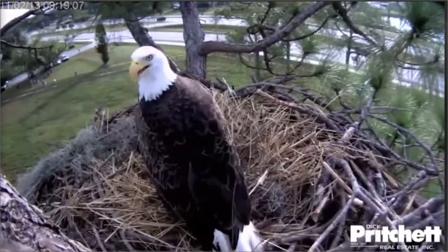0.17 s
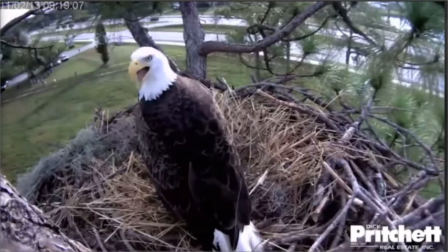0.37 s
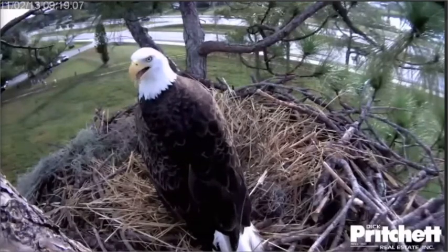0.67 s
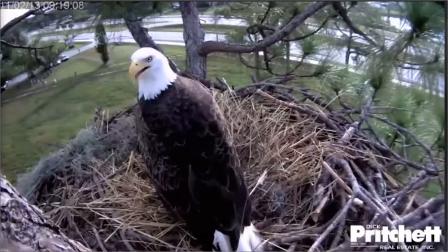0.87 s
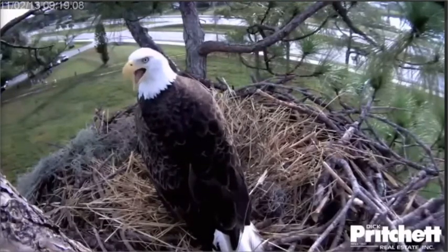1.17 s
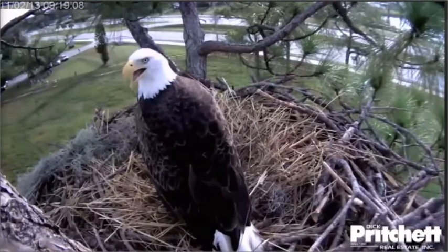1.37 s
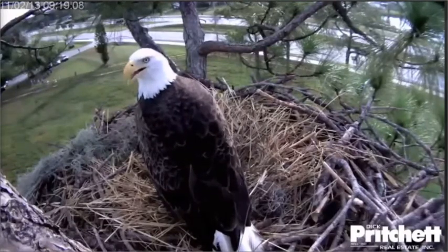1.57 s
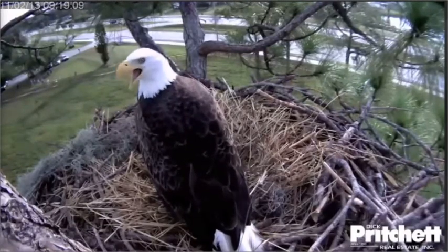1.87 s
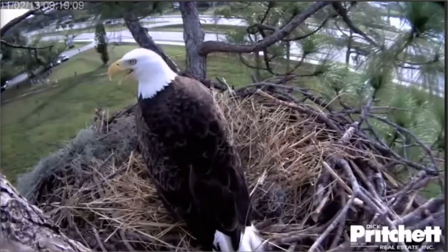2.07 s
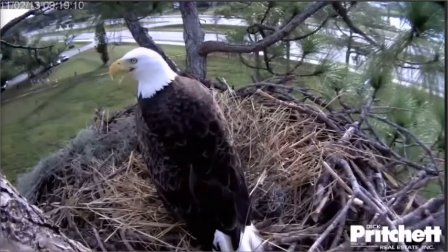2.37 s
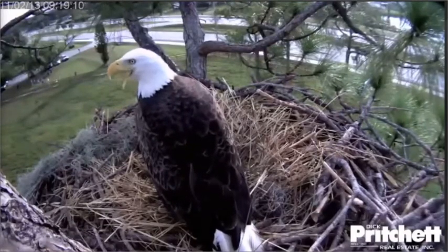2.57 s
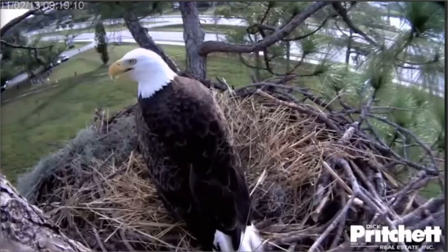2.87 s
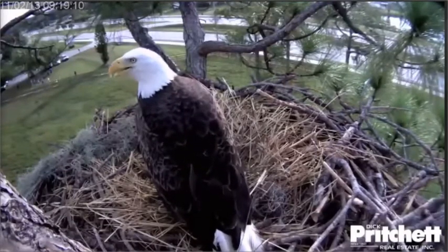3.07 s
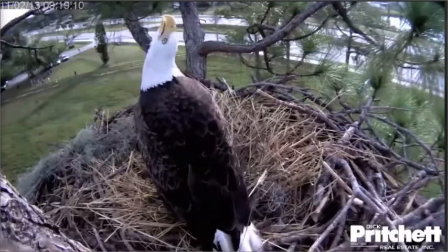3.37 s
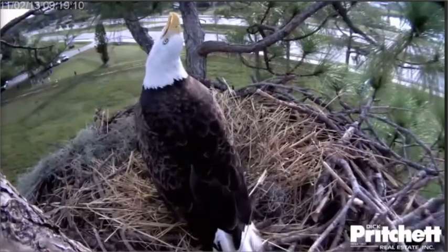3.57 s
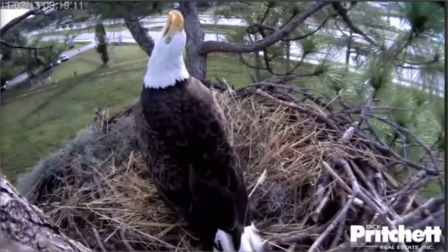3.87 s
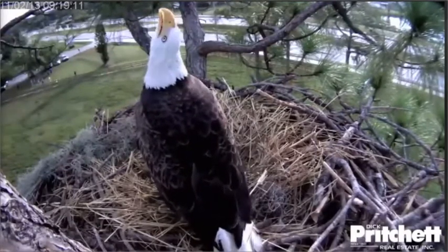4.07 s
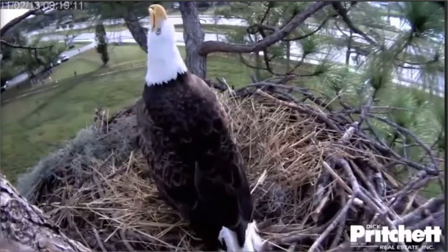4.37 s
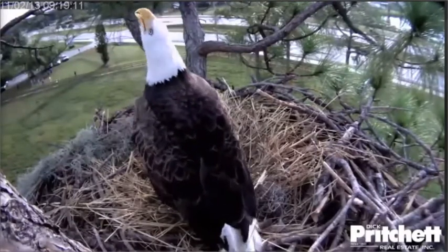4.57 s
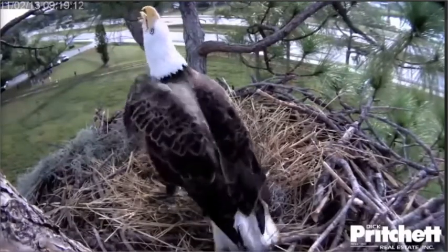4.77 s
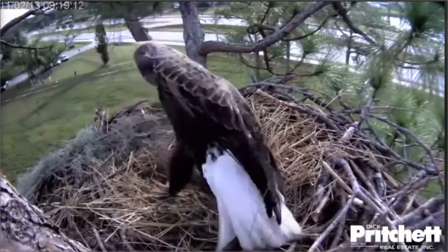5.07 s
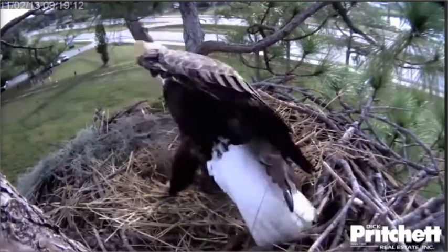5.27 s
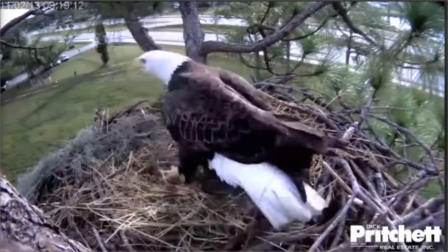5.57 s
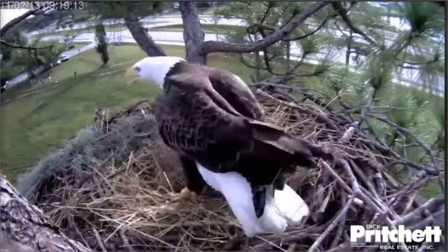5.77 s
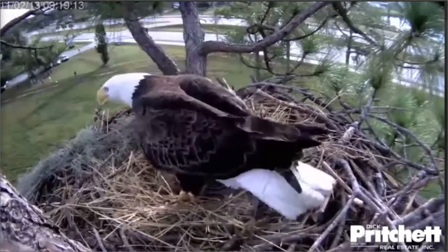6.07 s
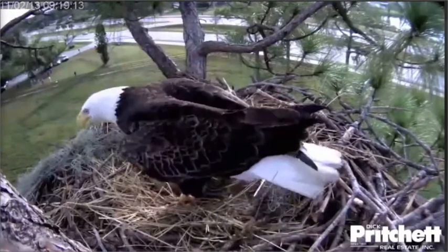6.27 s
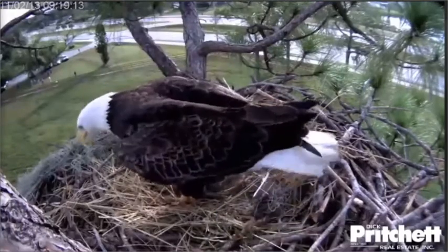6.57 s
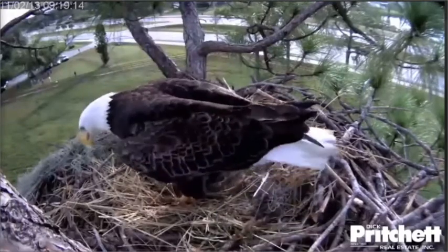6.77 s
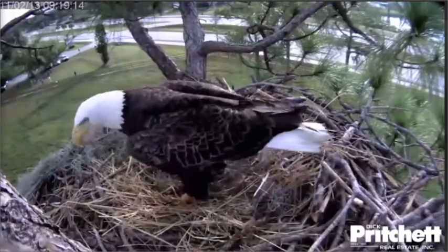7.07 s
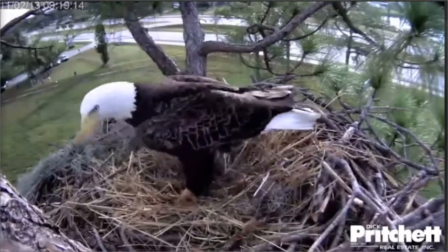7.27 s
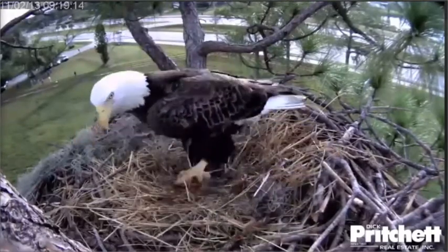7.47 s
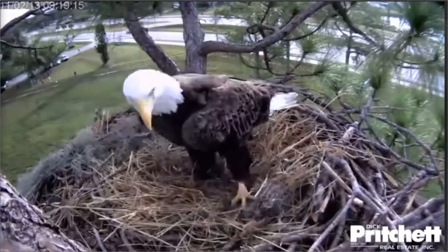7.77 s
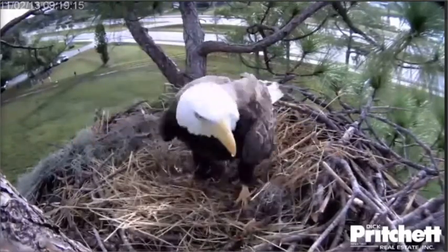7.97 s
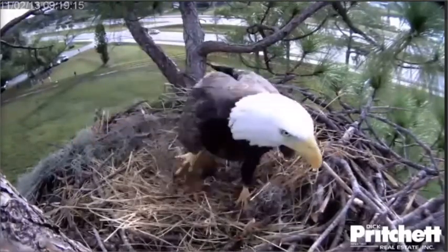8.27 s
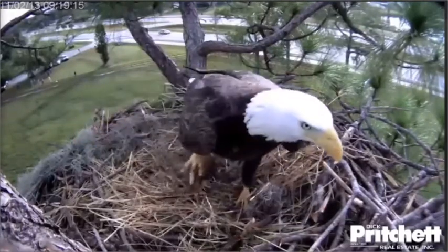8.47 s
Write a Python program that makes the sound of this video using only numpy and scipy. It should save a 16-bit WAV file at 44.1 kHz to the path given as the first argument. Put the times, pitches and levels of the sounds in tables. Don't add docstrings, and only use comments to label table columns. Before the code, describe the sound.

Outdoors at a treetop nest, a large eagle calls close to a cheap microphone. A low engine drone fades at once, then four long piercing whistles each start high and crack lower. Five short chips follow, each crumbling into a dry rapid chitter. After a pause come two quick notes. Steady hiss, faint mains hum and distant cars continue throughout.

```python
import sys
import numpy as np
from scipy import signal
from scipy.io import wavfile
from scipy.ndimage import uniform_filter1d

SR = 44100
rng = np.random.default_rng(int(sys.argv[2]) if len(sys.argv) > 2 else 0)


def volts(x):
    e = np.asarray(x, float) / 20
    return 10 ** e


def file_out(sig):
    cols = np.atleast_2d(sig).T
    lim = np.clip(cols, -1, 1)
    pcm = np.round(lim * 32767).astype(np.int16)
    wavfile.write(sys.argv[1], SR, pcm)


N = 381024


def evened(x):
    return x / np.sqrt(np.mean(x ** 2) + 1e-20)


def wander(count, width):
    noise = rng.standard_normal(count)
    return evened(uniform_filter1d(uniform_filter1d(noise, width), width))


def unrolled(rows):
    s, *columns = np.transpose(rows)
    t = np.arange(s[0], s[-1], 1 / SR)
    return s[0], [np.interp(t, s, c) for c in columns]


def add(mix, s, sound):
    part = mix[round(s * SR):][:len(sound)]
    part += sound[:len(part)]


def resonate(x, hz, width):
    turn = np.exp(2j * np.pi * np.cumsum(hz * np.ones(len(x))) / SR)
    r = np.exp(-np.pi * width / SR)
    return 2 * (turn * signal.lfilter([1 - r], [1, -r], x / turn)).real


# quarter_pitch_multiple, level_db
RASP_PARTIALS = [(1, -5), (2, -9), (3, -16), (5, 0.5), (6, -10), (7, -2.5)]


def note(rows, rasp_db=-40, rasp_s=0.0037, fade_s=0.0027, flutter=0.0016, shimmer=0.055,
         upper_db=-6, air_db=-30, near_db=0):
    s, (hz, level_db, *extra) = unrolled(rows)
    half_db, octave_db = extra + [level_db - 40.5, level_db - 34][len(extra):]
    count = len(hz)
    t = np.arange(count) / SR
    wobble, tremor = wander(count, 200), wander(count, 200)
    phase = 2 * np.pi * np.cumsum(hz * (1 + flutter * wobble)) / SR
    level = uniform_filter1d(volts(level_db), 90) * (1 + shimmer * tremor)
    onset = level.mean() * np.exp(-(t / rasp_s - 1) ** 2)
    rasp = onset * sum(volts(rasp_db + db) * np.sin(phase * k / 4 + k * k) for k, db in RASP_PARTIALS)
    air = evened(resonate(rng.standard_normal(count), 2900, 1200))
    tone = level * (np.sin(phase) + volts(air_db) * air) + rasp
    tone += volts(octave_db) * np.sin(2 * phase)
    doubled = np.sin(phase / 2) + volts(upper_db) * np.sin(3 * phase / 2)
    tone += volts(half_db) * (1 + 0.47 * tremor) * doubled
    edge = np.clip(np.minimum(t, t[::-1]) / fade_s, 0, 1)
    return s, np.sqrt(2) * volts(near_db) * tone * np.sin(np.pi / 2 * edge) ** 2


def catch(start, length, top_hz, effort_db, half_db):
    base_hz, climb_s, creep_hz_per_s, linger_s = 2420, .018, 1500, .004
    rise_s, fall_s, rise_db, fall_db = .0045, .013, 16, 6
    first_half_db, sag_db_per_hz, easy_hz = -49, .005, 2650
    t = np.linspace(0, length, 40)
    leap = 1 - np.exp(-(t - linger_s).clip(0) / climb_s)
    climb_hz = top_hz - base_hz - creep_hz_per_s * length
    hz = base_hz + creep_hz_per_s * t + climb_hz * leap / leap[-1]
    level_db = effort_db + .4 - sag_db_per_hz * (hz - easy_hz).clip(0)
    level_db -= rise_db * np.clip(1 - t / rise_s, 0, 1)
    level_db -= fall_db * np.clip(1 - t[::-1] / fall_s, 0, 1)
    half_db = first_half_db + (half_db - first_half_db) * np.clip(1.8 * t / length, 0, 1)
    return np.transpose([start + t, hz, level_db, half_db])


# pitch_hz, fundamental_db, octave_db, half_pitch_db
THROAT_RESPONSE = [(1800, -6.5, -17.5, -49), (1850, -6, -15, -47.5), (1933, -5, -14, -33.5),
                   (2054, 1.1, -19.5, -35.5), (2116, -0.1, -21.5, -39), (2137, 1.4, -31.5, -31.5)]


def whistle(start, end, low_hz, top_hz, effort_db, press):
    rise_hz_per_s, slow_hz_per_s = 760, 280
    drop_s, drop_to_hz, drop_db = .042, 1750, 1.5
    break_s, break_hz, end_s, end_db = .011, 87.6, .008, 12
    press_late_s, press_choke_db, press_octave_db = .06, 6.5, 8.5
    t = np.linspace(0, end - start, 120)
    left = t[::-1]
    u = np.clip(t / (t[-1] - drop_s), 0, 1)
    rising_hz = low_hz + rise_hz_per_s * (t - press_late_s * press ** 2)
    hz = np.clip(rising_hz, low_hz + slow_hz_per_s * t, top_hz)
    hz = uniform_filter1d(hz, size=15, mode="nearest")
    drop = np.clip(1 - left / drop_s, 0, 1)
    hz += (drop_to_hz - top_hz) * np.sin(np.pi / 2 * drop) ** 2.4
    f, *partials = np.transpose(THROAT_RESPONSE)
    envelope_db = effort_db - end_db * np.clip(1 - left / end_s, 0, 1)
    level_db, octave_db, half_db = (envelope_db + np.interp(hz, f, db) for db in partials)
    settling = np.clip(1 - t / break_s, 0, 1)
    level_db -= press_choke_db * press * (1 - u) ** 0.76 + drop_db * np.clip(2.5 * drop, 0, 1)
    octave_db += press_octave_db * press - 30 * settling
    return np.transpose([start + t, hz + break_hz * settling, level_db, half_db, octave_db])


# start_s, length_s, top_hz, effort_db, end_half_pitch_db
CATCHES = [(.887, .123, 2850, -28.7, -46), (1.671, .051, 3040, -29.8, -43),
           (2.417, .049, 3070, -30.6, -39.5), (3.107, .047, 3090, -33, -35)]
# end_s, low_hz, top_hz, effort_db, pressing_0_to_1
BROKEN_WHISTLES = [(1.316, 1914, 2048, -30.3, 0.9), (2.07, 1944, 2136, -28, .55),
                   (2.765, 1980, 2142, -28, 0.2), (3.428, 1980, 2134, -28.5, .05)]
CATCH_RASP = [-18, -13.5, -7.5, -18.5]
BREAK_RASP = [-3, -10.5, -11.5, -14]


def long_notes(out):
    for first, second, catch_db, break_db in zip(CATCHES, BROKEN_WHISTLES, CATCH_RASP, BREAK_RASP):
        add(out, *note(catch(*first), catch_db, fade_s=0.0014, flutter=0.0078, shimmer=0.019,
                       upper_db=-12, air_db=-31, near_db=-1.0))
        break_at = first[0] + first[1] - .005
        add(out, *note(whistle(break_at, *second), break_db, rasp_s=0.0041, upper_db=-1.5, air_db=-35))


# start_s, pitch_hz, level_db
SYRINX_LEAK = [
    (1.105, 2480, -60),
    (1.134, 2505, -53.5),
    (1.152, 2520, -55),
    (1.164, 2550, -49.5),
    (1.18, 2560, -62),
]


def leak(out):
    add(out, *note(SYRINX_LEAK, flutter=0.0061, shimmer=.4, air_db=-10.5, fade_s=0.0098))


def arch(start, length, from_hz, to_hz, peak_db, skew, blunt, shelf, octave_db=-31):
    u = np.linspace(0, 1, 24)
    level_db = peak_db + 20 * blunt * np.log10(np.sin(np.pi * u ** skew).clip(0) + .03)
    glide = (1 - shelf) * u + shelf * (.5 + 4 * (u - .5) ** 3)
    hz = from_hz + (to_hz - from_hz) * glide
    return np.transpose([start + length * u, hz, level_db, level_db - 39.5, level_db + octave_db])


# start_s, length_s, from_hz, to_hz, peak_db
CHIP_NOTES = [
    (4.343, .031, 2060, 2360, -25.3),
    (4.83, .038, 2010, 2390, -25.2),
    (5.358, .045, 2040, 2460, -24.8),
]
# start_s, length_s,
# from_hz, to_hz, peak_db
EARLY_PEAK_NOTES = [(3.849, .035, 2190, 2380, -26), (3.906, .016, 2880, 2900, -36),
                    (3.974, .022, 2900, 2980, -32), (3.993, .024, 3000, 2940, -33.5),
                    (4.37, .014, 2790, 2745, -29.5), (4.863, .018, 2780, 2710, -27.5),
                    (5.394, .017, 2820, 2790, -32), (5.923, .037, 2350, 2450, -28.3),
                    (7.375, .015, 2420, 2330, -34)]
# start_s, pitch_hz, level_db
LAST_PAIR = [
    [(7.203, 2280, -51), (7.2065, 2340, -34.6), (7.2203, 2470, -25.7), (7.2341, 2520, -26.4),
     (7.2479, 2580, -27.7), (7.2616, 2520, -28.5), (7.2754, 2420, -27.4), (7.2892, 2280, -31.8),
     (7.303, 2210, -43.5)],
    [(7.324, 2250, -49.5), (7.3275, 2240, -28.9), (7.3344, 2560, -25.9), (7.3414, 2600, -27),
     (7.3483, 2480, -25.8), (7.3552, 2530, -25.5), (7.3621, 2560, -27.4), (7.3691, 2450, -27.1),
     (7.376, 2490, -37.7)],
]
# start_s, length_s, from_hz, to_hz, peak_db
SLIDES = [(4.339, .011, 1610, 1860, -31.5), (5.354, 0.012, 1620, 1820, -39),
          (5.906, .024, 1645, 1950, -30.5), (7.3, 0.012, 1950, 1870, -40)]


def short_notes(out):
    for row in EARLY_PEAK_NOTES:
        rows = arch(*row, skew=.62, blunt=.8, shelf=0)
        add(out, *note(rows, rasp_db=-20, fade_s=.0013, flutter=.009, shimmer=.08, air_db=-27, near_db=-.5))
    chips = [arch(*row, skew=.9, blunt=.7, shelf=.75) for row in CHIP_NOTES]
    for rows in chips + LAST_PAIR:
        add(out, *note(rows, rasp_db=-21.0, fade_s=0.0012, flutter=0.005, shimmer=0.029,
                       air_db=-36.0, near_db=-1.23))
    for row in SLIDES:
        rows = arch(*row, skew=1.3, blunt=0.73, shelf=0, octave_db=-19)
        add(out, *note(rows, rasp_db=-18.5, fade_s=0.0012))


def pip(s, peak_db, hz, length):
    t = np.arange(900) / SR
    u = t / (0.39 * length)
    ragged = 1 + 0.39 * evened(uniform_filter1d(rng.standard_normal(len(t)), 40))
    ring = ragged * u * np.exp(1 - u) * np.sin(2 * np.pi * hz * t * (1 - 4.2 * t))
    snap = np.minimum(t / 0.00056, 1) * np.exp(-t / 0.00096)
    snap = snap * (volts(-19.5) * np.sin(2 * np.pi * 3500 * t) + volts(-5) * np.sin(2 * np.pi * 1700 * t))
    return s - .0003, volts(peak_db - 1.1) * (ring + snap)


def sputter(rows):
    s, (level_db, hz) = unrolled(rows)
    chance, size, sign = rng.random((len(hz), 3)).T
    clicks_per_s = 1300
    clicks = volts(-4.0 * np.log(size + 0.0056)) * np.sign(sign - .5) * (chance < clicks_per_s / SR)
    hz = hz * (1 + 0.17 * wander(len(hz), 180))
    throat = evened(resonate(resonate(clicks, hz, 550), hz, 1500))
    throat += 0.11 * evened(resonate(clicks, 3450, 490))
    throat += 0.26 * evened(resonate(clicks, 0.74 * hz, 700))
    return s, volts(level_db) * throat * signal.windows.tukey(len(hz), .06)


# start_s, peak_db, pitch_hz, length_s
CLEAR_PIPS = [(3.9266, -29.2, 2580, .0022), (3.9377, -34.8, 2830, .004), (3.9471, -38.8, 2800, .0074),
              (4.3892, -37.1, 2200, .0018), (4.3969, -37.6, 2770, .0031), (4.4174, -32, 2560, .0023),
              (4.4286, -29.6, 2730, .0023), (4.4396, -30.2, 2770, .0047), (4.4507, -29.4, 2810, .0029),
              (4.4627, -34.3, 2970, .0031), (4.4852, -37.8, 2990, .0033), (4.4905, -36.9, 2690, .0039),
              (4.5183, -33.3, 2550, .0021), (4.8865, -34.6, 2510, .0018), (4.8953, -31.6, 2620, .0041),
              (4.9171, -27.9, 2660, .0047), (4.9413, -37.6, 2580, .0081), (4.9766, -30.1, 2660, .0023),
              (4.9858, -33.4, 3070, .003), (5.0062, -34.1, 2700, .0039), (5.4138, -38.2, 2390, .0027),
              (5.4221, -35.1, 2540, .0033), (5.4429, -31.2, 2690, .0028), (5.4476, -36.8, 2660, .002),
              (5.4709, -38.3, 2610, .0051), (5.5016, -33.5, 2500, .0023), (5.5316, -37.9, 2630, .0032),
              (5.9975, -38.4, 2840, .0043), (6.0106, -32, 2580, .0037), (6.0606, -36, 2530, .0022)]


def chitter(start, end, air_db, throat_hz, shut_hz):
    beat_s, beat_jitter, shut_s, clear_s = 0.01, .35, .028, .005
    faint_db, spread_db, pitch_spread, faint_s = -43, 2, .09, .003
    upper_hz, upper_share, upper_db, upper_s = 3380, .3, -45, 0.0057
    jitter, size, tune, span, upper = rng.random((20, 5)).T
    s = start + beat_s * (np.arange(20) + .5 + 2 * beat_jitter * (jitter - .5))
    shut = np.clip(1 - (end - s) / shut_s, 0, 1) ** .5
    hz = (throat_hz + (shut_hz - throat_hz) * shut) * (1 + 2 * pitch_spread * (tune - .5))
    high = (upper < upper_share) & (shut == 0)
    hz = np.where(high, upper_hz * (.95 + 0.12 * tune), hz)
    peak_db = np.where(high, upper_db, faint_db) + 2 * spread_db * (size - .5)
    length = np.where(high, upper_s, faint_s) * (.7 + .6 * span) * (1 - .45 * shut)
    flicks = np.transpose([s, peak_db, hz, length])
    gap = abs(s[:, None] - np.array(CLEAR_PIPS)[:, 0] - clear_s / 2).min(1)
    flicks = flicks[(s < end - .004) & ((gap > clear_s) | high)]
    air = [(start, air_db, throat_hz), (end - shut_s, air_db, throat_hz),
           (end, air_db + 2.0, (throat_hz + shut_hz) / 2)]
    return flicks, air


# start_s, end_s, air_db, throat_hz, shut_throat_hz
CHITTER_RUNS = [(3.877, 4.039, -52, 2700, 2034), (4.38, 4.542, -53.5, 2650, 1780),
                (4.88, 5.038, -52.5, 2616, 1440), (5.399, 5.555, -56, 2460, 1850),
                (5.955, 6.113, -58.5, 2510, 1560)]


def chitters(out):
    for row in CLEAR_PIPS:
        add(out, *pip(*row))
    for row in CHITTER_RUNS:
        flicks, air = chitter(*row)
        add(out, *sputter(air))
        for flick in flicks:
            add(out, *pip(*flick))


def eagle():
    out = np.zeros(N)
    long_notes(out)
    leak(out)
    short_notes(out)
    chitters(out)
    return out


def trees(x):
    echo_s, echo_db, echo_smear_s = .3, -53, .012
    t = np.arange(SR) / SR
    near, far = rng.standard_normal((SR, 2)).T * (t > .004) / 20
    far = resonate(far, 2550, 160) * volts(-35.5 - 60 * t / 0.89)
    far += volts(echo_db) * near * 2 * np.exp(-((t - echo_s) / echo_smear_s) ** 2)
    return signal.fftconvolve(x, near * volts(-32.5 - 60 * t / 0.068) + far)[:N]


# frequency_hz, density_db
HISS_SPECTRUM = [(12, -23), (30, -5.5), (60, -14), (150, -20), (480, -23.5), (530, -27), (1200, -29.5),
                 (1650, -28.5), (2200, -31.5), (2600, -31), (2750, -36.5), (3500, -40), (4200, -38.5),
                 (6000, -88.5)]
# start_s (of the peak), swell_db, half_width_s
PASSING_CARS = [(0.3, 0.8, 0.74), (3.6, -0.5, 0.33), (6.35, 1.5, .45), (7.5, 1.5, .5)]


def ambience():
    frames, hz = N // 256 + 5, np.fft.rfftfreq(1024, 1 / SR)
    t = np.arange(frames) * 256 / SR
    a, b, patches = rng.standard_normal((frames, 513, 3)).T
    a, b, patches = a.T, b.T, patches.T
    patches = evened(uniform_filter1d(uniform_filter1d(patches, 8, 0), 10, 1))
    f, level_db = np.transpose(HISS_SPECTRUM)
    swell_db = sum(db * np.exp(-((t - s) / width) ** 2) for s, db, width in PASSING_CARS)
    bass = 1 / (1 + (hz / 500) ** 2)
    field_db = np.interp(np.log(hz + 1), np.log(f + 1), level_db)[:, None] + 1.9 * patches.T
    field_db += bass[:, None] * swell_db
    throb = np.cos(2 * np.pi * 17.0 * (t - 7.424))
    field_db += 5.7 * np.clip(hz / 600 - 4.8, 0, 1)[:, None] * throb
    spectrum = (a + 1j * b).T * volts(field_db)
    return volts(-54.5) * evened(signal.istft(spectrum, nperseg=1024, noverlap=768)[1][:N])


# frequency_hz, width_hz, level_db
WHINE_BANDS = [(876, 160, -73.5), (2495, 84, -71), (2340, 14, -85), (3106, 16, -83), (3830, 9.2, -85.5)]


def whines():
    out = np.zeros(N)
    for hz, width, db in WHINE_BANDS:
        noise = rng.standard_normal(N)
        out += volts(db) * evened(resonate(resonate(noise, hz, width), hz, width))
    return out


# frequency_hz, level_db
MAINS_OVERTONES = [(59.5, -67.5), (119, -74), (178.2, -68), (237.8, -69.5), (297, -74.5), (356, -79.5)]


def hum():
    t = np.arange(N) / SR
    waver = 1 + .3 * evened(uniform_filter1d(rng.standard_normal((len(MAINS_OVERTONES), N)), 6000))
    tones = (volts(db) * w * np.sin(2 * np.pi * hz * t) for (hz, db), w in zip(MAINS_OVERTONES, waver))
    return np.sqrt(2) * sum(tones)


# start_s, pitch_hz, level_db
TRUCK_DRONE = [(0.0, 124, -54.5), (0.052, 126, -47), (0.082, 118.4, -58.5), (0.224, 98, -50),
               (0.482, 92.7, -57), (0.678, 66.8, -72), (0.736, 63.5, -47), (0.8, 53.8, -86.5)]


def truck():
    s, (hz, level_db) = unrolled(TRUCK_DRONE)
    phase = 2 * np.pi * np.cumsum(hz) / SR
    drone = np.sqrt(2) * volts(level_db) * (np.sin(phase) + volts(-20) * np.sin(2 * phase))
    fade = signal.windows.tukey(2 * len(phase), .1)[len(phase):]
    return np.pad(drone * fade, (0, N - len(phase)))


def scene():
    bird = eagle()
    return (bird + trees(bird) + ambience() + whines() + hum() + truck())[None]


def low_pass(x):
    return signal.sosfilt(signal.butter(12, 15770, fs=SR, output="sos"), x)


# frequency_hz, gain_db
MIC_RESPONSE = [(0, -0.5), (1000, 1), (2000, 4), (3000, 8), (3700, 8), (4200, 3.5), (4800, -35.5),
                (5500, -75)]


def record(dry):
    packet_in, packet_out, stretch, lead = 160, 220, 4, 201
    glitch_s, glitch_db, offset = 1.7352, -21, -.0095
    hz, gain_db = np.transpose(MIC_RESPONSE)
    grid = np.linspace(0, SR, 1025)
    mic = signal.firwin2(401, grid, volts(np.interp(grid, hz, gain_db)), fs=2 * SR)
    band = signal.butter(1, [12, 700], "bandpass", fs=SR, output="sos")
    bend = signal.sosfilt(band, dry[0] ** 2)
    x = np.pad(dry[0] + 1.8 * bend + offset, (lead, 2000), "edge")
    x = signal.resample_poly(x, 2, 11, window=mic)
    add(x, (glitch_s + lead / SR) * packet_in / packet_out / stretch, volts([glitch_db]))
    full, mu, steps = volts(-5.5), 255, 127
    code = np.round(steps * np.log1p(mu * abs(x) / full) / np.log1p(mu))
    x = np.sign(x) * full * np.expm1(code / steps * np.log1p(mu)) / mu
    packets = x[:len(x) // packet_in * packet_in].reshape(-1, packet_in)
    place = np.arange(packet_out) * packet_in / packet_out
    x = np.concatenate([np.interp(place, np.arange(packet_in), p) for p in packets])
    x = np.interp(np.arange(N) + lead, stretch * np.arange(len(x)), x)
    x = signal.oaconvolve(np.pad(x, 300, "edge"), signal.firwin(601, 15800, fs=SR), "valid")
    return low_pass(x[None])


dry = scene()
out = record(dry)
file_out(out)
```